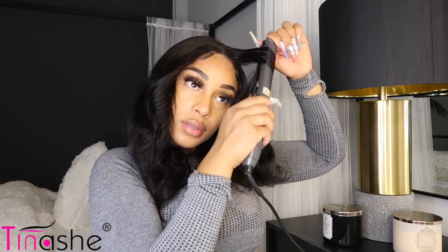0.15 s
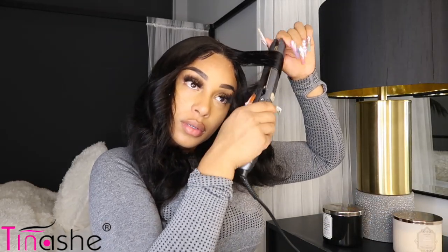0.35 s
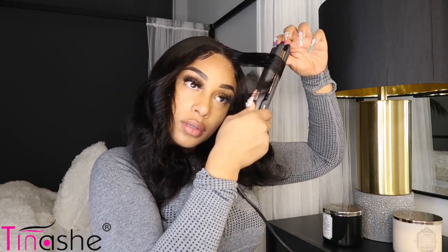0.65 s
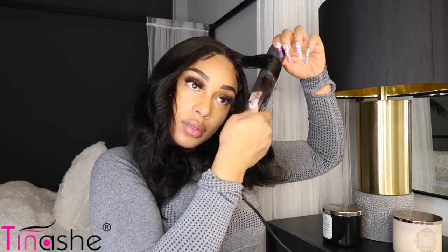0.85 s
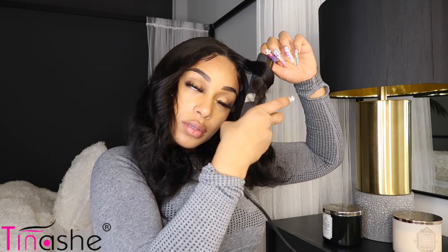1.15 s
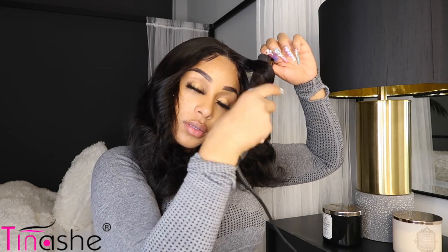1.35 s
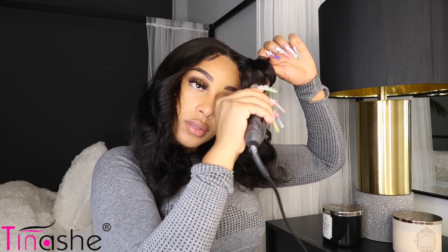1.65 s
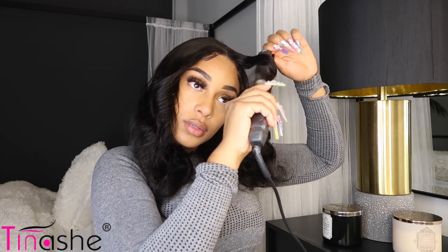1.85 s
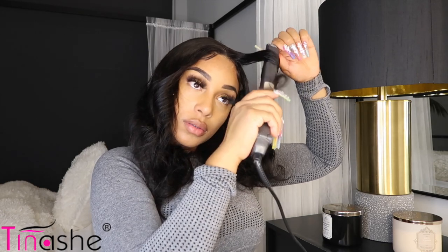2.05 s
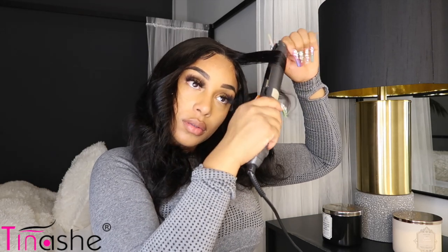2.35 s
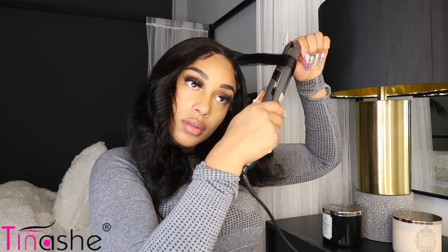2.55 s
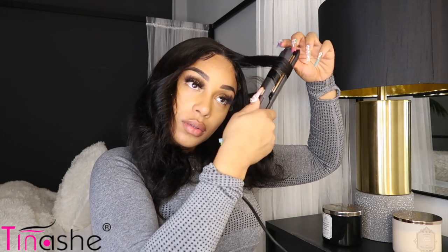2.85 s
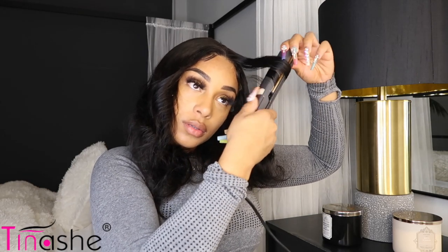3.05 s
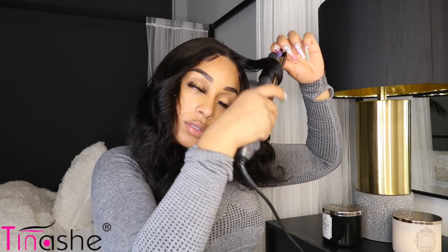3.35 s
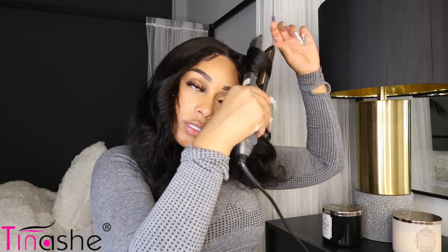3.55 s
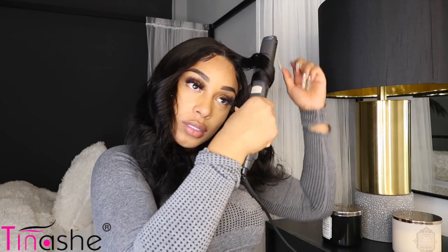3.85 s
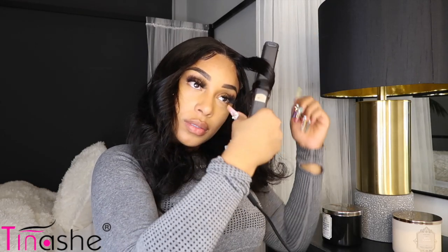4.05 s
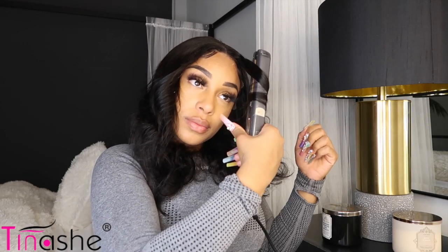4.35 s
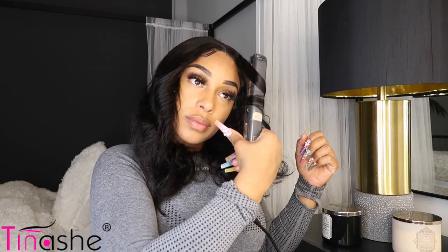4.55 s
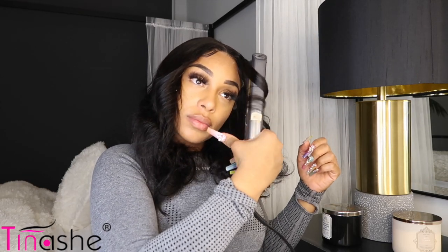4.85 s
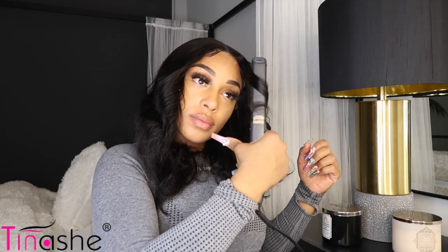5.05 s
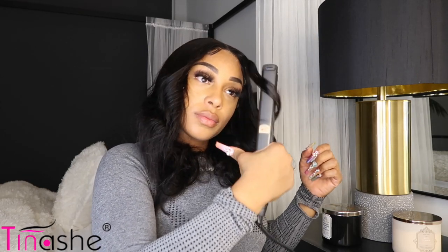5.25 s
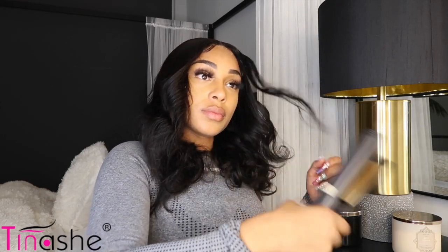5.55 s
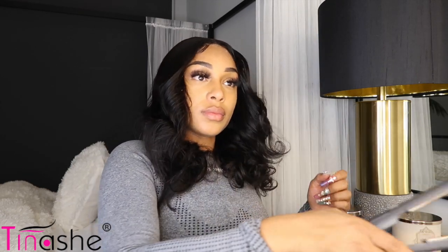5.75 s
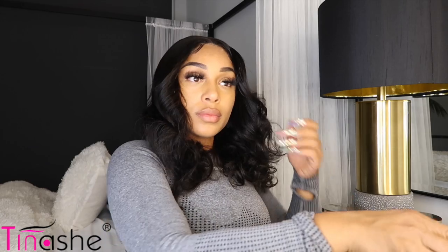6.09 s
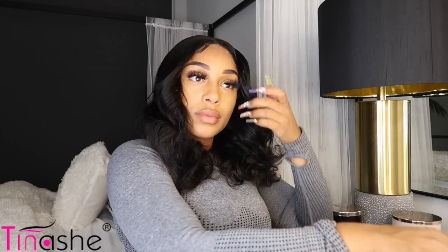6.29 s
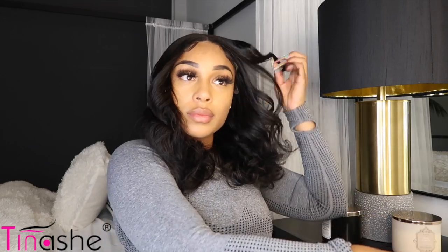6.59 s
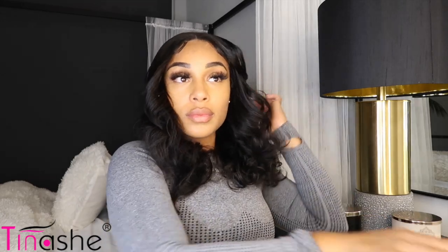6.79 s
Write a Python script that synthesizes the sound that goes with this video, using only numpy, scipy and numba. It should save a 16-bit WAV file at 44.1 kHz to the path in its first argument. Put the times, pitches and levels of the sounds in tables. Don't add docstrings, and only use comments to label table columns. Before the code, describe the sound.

In a quiet, softly furnished bedroom with low ventilation hum, fingernails and a hinge tick faintly on a plastic hair iron. One firm plate snap comes, then after a pause several quick, hard, brittle snaps. The iron brushes and bumps a wooden side table, then lands with a loud clack and hollow boom, rocking briefly to rest. Heard by a phone at arm's length, which dips the level after loud blows.

```python
import sys
import numpy as np
from scipy import signal
from scipy.fft import rfft, irfft, next_fast_len
from scipy.io import wavfile
from scipy.ndimage import uniform_filter1d
from numba import njit

SR = 44100
rng = np.random.default_rng(int(sys.argv[2]) if len(sys.argv) > 2 else 0)


def volts(x):
    e = np.asarray(x, float) / 20
    return 10 ** e


def unload_wav(signal):
    wavfile.write(
        sys.argv[1],
        SR,
        np.round(np.clip(np.atleast_2d(signal).T, -1, 1) * 32767).astype(np.int16),
    )


N = 305377

IRON_PAN_DB, IRON_LAG = -1.0, 0.9
CRACK_SIDE_DB = -2.5
SMALL_SCATTER_DB = 1.5
OPPOSITE = np.array([[1], [-1]])


def unit(x):
    return x / np.sqrt(np.mean(x ** 2))


def peak_one(x):
    return x / np.abs(x).max()


def add(track, start, sound):
    i = int(start * SR)
    track[..., i:i + sound.shape[-1]] += sound[..., :N - i]


def decay(t, t60):
    return 1000.0 ** (-t / t60)


def ring(modes, stretch, scatter_db):
    detune = 0.012
    hz, db, t60 = np.array(modes).T[:, :, None]
    t = np.arange(int(0.3 * SR)) / SR
    level_luck, pitch_luck = rng.standard_normal((len(modes), 2)).T[:, :, None]
    swing = np.sin(2 * np.pi * hz * (1 + detune * pitch_luck) * t)
    y = volts(db + scatter_db * level_luck) * swing * decay(t, t60 * stretch)
    return y[::2].sum(axis=0) - y[1::2].sum(axis=0)


def push(y, ms):
    contact = np.hanning(int(np.clip(ms, 0.05, 8) * SR / 1000) + 3)
    return peak_one(np.convolve(y, contact)[:len(y)])


def walk(rate):
    hold = int(SR / rate)
    steps = np.repeat(rng.standard_normal(N // hold + 1), hold)
    return uniform_filter1d(uniform_filter1d(steps, hold), hold)[:N]


def coloured(points, size, modes=()):
    hz, db = np.transpose(points)
    f = np.maximum(np.arange(size // 2 + 1) * SR / size, 1)
    lift = sum(g / (1 + (2 * (f - c) / w) ** 2) for c, w, g in modes)
    db = np.interp(np.log(f), np.log(hz), db) + lift
    return irfft(rfft(rng.standard_normal(size)) * volts(db), size)


def crack(t60):
    # frequency in Hz, level in dB per Hz.
    spectrum = [(2500, -7), (4800, 1.5), (6200, 1.5), (8000, -4), (10500, -10.5), (14000, -9), (16500, -22)]
    t = np.arange(int(0.3 * SR)) / SR
    spit_and_fizz = decay(t, t60) + volts(-5) * decay(t, 14.0 * t60)
    return peak_one(coloured(spectrum, len(t)) * spit_and_fizz)


def ports(x, pan_db, lag, low_hz, high_hz):
    x = signal.sosfilt(signal.butter(3, [low_hz, high_hz], "band", fs=SR, output="sos"), x)
    size = next_fast_len(N)
    turn = np.exp(-2j * np.pi * np.arange(size // 2 + 1) / size * lag)
    late = irfft(rfft(x, size) * turn, size)[:N]
    return volts(np.array([[pan_db], [-pan_db]]) / 2) * np.array([late, x])


def iron_ports(out, wide):
    return ports(out, IRON_PAN_DB, IRON_LAG, 300, 13200) + wide * OPPOSITE


def snaps():
    times = [3.7803, 4.7720, 5.0044, 5.2154, 5.3980, 5.5638]
    # peak in dB, lower modes re peak in dB, plate ring in dB.
    strengths = [
        (-3.5, -7.5, -29.5),
        (-25, -7.5, -41),
        (1, -5, -39),
        (-5.5, -3, -38.5),
        (1, -6, -33.5),
        (-21, -5.5, -27),
    ]
    # frequency in Hz, level in dB, t60 in seconds.
    arm_low = [(700, -1, 0.02), (1430, 16, 0.016), (1820, 9.5, 0.03), (2033, 14, 0.018)]
    arm_mid = [(3170, 0.5, 0.014), (3640, -7.5, 0.016), (3850, -0.3, 0.011), (4850, -7.5, 0.0034),
               (6100, -13, 0.0099)]
    plate = [(3190, -16.5, .3)]
    # share of the chatter time, level in dB.
    chatter = [(.55, -11), (1.1, -11)]
    chatter_ms, arm_stretch = 1.603, 0.82
    out, wide = np.zeros((2, N))
    for s, (db, low_db, plate_db) in zip(times, strengths):
        crack_db = -14.5 + 0.34 * db
        arms = push(ring(arm_mid, arm_stretch, 1.2), 0.1)
        arms = arms + volts(low_db) * push(ring(arm_low, arm_stretch, 1.5), 0.1)
        for late, size_db in chatter:
            arms = arms + volts(size_db) * np.roll(arms, int(late * chatter_ms * SR / 1000))
        snap = peak_one(arms) + volts(crack_db) * crack(0.0058) + volts(plate_db) * ring(plate, 0.73, 0)
        add(out, s, volts(db) * snap)
        add(wide, s, volts(db + crack_db + CRACK_SIDE_DB) * crack(0.005))
    return iron_ports(out, wide)


def ticks():
    # start in seconds, peak in dB, pitch in Hz, crack re peak in dB.
    taps = [(0.989, -36, 3570, -15), (.998, -29.5, 3580, -19), (1.013, -35.5, 1470, -19),
            (1.109, -32, 3520, -10), (1.168, -36.5, 3080, -0.5), (1.270, -26.5, 2670, -4),
            (1.454, -39, 1206, -26), (1.796, -37.5, 2815, -13), (2.035, -42, 1110, -28),
            (3.417, -43.5, 4500, 0), (3.489, -37.5, 1270, -30), (3.502, -29, 2150, -38),
            (3.671, -40, 3480, -15), (4.841, -40.5, 2170, -12), (5.884, -33, 2640, -18),
            (6.411, -12.5, 2790, -14.5)]
    out, wide = np.zeros((2, N))
    for s, db, hz, crack_db in taps:
        t60 = 41 / hz
        modes = [(hz, 0, t60), (0.44 * hz, -4, 0.95 * t60), (0.91 * hz, -5, t60), (1.3 * hz, -5, t60)]
        shell = push(ring(modes, 0.88, SMALL_SCATTER_DB), 0.08)
        add(out, s, volts(db) * (shell + volts(crack_db) * crack(0.55 * t60)))
        add(wide, s, volts(db + crack_db + CRACK_SIDE_DB) * crack(0.7 * t60))
    return iron_ports(out, wide)


def table():
    # start in seconds, peak in dB, boom share in dB, ring stretch.
    knocks = [(5.565, -29.5, -2, 0.57), (5.889, -21, 12, .6), (5.9, -23, 9.5, 0.82),
              (5.935, -31.5, 8.5, .8), (5.974, -34, 13, .76), (5.988, -13.5, 1.7, 1.9),
              (6.0149, -10.5, 4, 1.37), (6.027, -30, 14, 0.4), (6.048, -22, -0.5, 0.36),
              (6.099, -30, 14, 1.6), (6.438, -16.5, 11.5, 1.1), (6.4502, 10, -24.5, 1.13),
              (6.4536, 9.5, -16.5, 0.2), (6.502, -6.5, -13, .8), (6.565, 0, 12.5, 2.7),
              (6.5764, 3.1, -8, 0.84), (6.603, 3.5, 1, 0.45), (6.613, -3, 1.5, 0.5), (6.63, -3.5, 3.5, 0.4),
              (6.663, -12.5, -10, 1.15)]
    # peak time in seconds, peak in dB,
    # rise in dB/s, settling in dB/s, grit level in dB.
    drags = [
        (5.6, -44.5, 204.5, 54, -6),
        (6.02, -21.5, 266, 274, -12),
        (6.412, -30.5, 5994, 105, 3.5),
        (6.459, -18, 912, 220, -6),
        (6.582, -16.5, 895.5, 188, -6.5),
    ]
    # frequency in Hz, level in dB, t60 in seconds.
    boom_modes = [(125.5, -3, 0.16), (190, -12.5, 0.16), (221, -20.5, 0.56), (306, -7, 0.19)]
    top_modes = [(425, 9.5, 0.03), (565, 7, 0.0217), (724, 8.5, 0.03), (986, 4.5, 0.027), (1294, 7, 0.015),
                 (2030, 3, 0.0087), (2130, -20.5, 0.24), (2730, -14.5, 0.04), (3440, -14, 0.053),
                 (4440, -12.5, 0.016), (7300, -7.5, 0.006)]
    out = np.zeros(N)
    for s, db, boom_db, stretch in knocks:
        blow = ring(top_modes, stretch, 2.0) + volts(boom_db) * ring(boom_modes, 0.7, 2.1)
        contact_ms = 0.82 * volts(0.88 * boom_db)
        add(out, s, volts(db) * push(blow, contact_ms))
    t = np.arange(N) / SR
    slips = rng.standard_normal((2, N)) * (rng.random((2, N)) < 900 / SR)
    slips = slips * volts(0.99 * rng.exponential(size=(2, N)))
    body_hit = push(ring(top_modes + boom_modes, 0.26, 0.62), 0.96)
    grit_hit = push(ring(top_modes[4:], 0.15, SMALL_SCATTER_DB), 0.14)
    body = unit(signal.fftconvolve(slips[0], body_hit)[:N])
    grit = unit(signal.fftconvolve(slips[1], grit_hit)[:N])
    for s, db, rise, settle, grit_db in drags:
        swell = volts(db - np.where(t < s, rise * (s - t), settle * (t - s)))
        out += swell * (body + volts(grit_db) * grit)
    return ports(out, -1.6, 1.8, 110, 11000)


def scuffs():
    # start in seconds, peak in dB, length in seconds, centre in Hz.
    strokes = [
        (0.997, -51.5, 0.0553, 1420),
        (1.277, -52.5, 0.052, 2880),
        (1.443, -54, 0.032, 1200),
        (3.403, -58.5, 0.038, 4960),
        (3.475, -47.5, 0.055, 1500),
        (3.576, -45.5, 0.033, 896),
    ]
    out = np.zeros(N)
    for s, db, length, hz in strokes:
        size = int(length * SR)
        grains = rng.standard_normal(4410)[:size] * volts(3.7 * rng.exponential(size=4410))[:size]
        band = signal.butter(2, [0.45 * hz, 1.47 * hz], "band", fs=SR, output="sos")
        add(out, s, volts(db) * unit(signal.sosfilt(band, grains)) * np.hanning(len(grains)))
    return ports(out, IRON_PAN_DB, IRON_LAG, 370, 15500)


def room(x):
    # frequency in Hz, t60 in seconds.
    reverb = [(150, 0.396), (1000, 0.37), (3200, 0.34), (8000, 0.33)]
    # frequency in Hz, side re mid in dB.
    width = [(60, -30.5), (110, -15.5), (200, -34), (380, -11), (700, -19), (1290, -17.5), (2380, -17),
             (4400, -25), (8120, 11), (15000, 12)]
    # delay in seconds, level in dB.
    walls = [(.0050, -20), (.0088, -17), (.0112, -19), (.0195, -21), (.0250, -21)]
    size = int(0.6 * SR)
    t = np.arange(size) / SR
    hz, t60 = np.transpose(reverb)
    side_hz, side_db = np.transpose(width)
    tail = np.zeros((2, size))
    for f in 84.2 * 2 ** np.arange(8):
        band = signal.butter(2, [f / 2 ** 0.5, f * 2 ** 0.5], "band", fs=SR, output="sos")
        fade = decay(t, np.interp(np.log(f), np.log(hz), t60))
        mid, side = signal.sosfilt(band, rng.standard_normal((2, size))) * fade
        tail += mid + volts(np.interp(np.log(f), np.log(side_hz), side_db)) * side * OPPOSITE
    tail *= 1 - np.exp(-t / 0.002)
    tail *= volts(-10) / np.sqrt(np.sum(tail.mean(axis=0) ** 2))
    for s, db in walls:
        tail[:, int(s * SR)] += volts(db)
    tail = signal.sosfilt(signal.butter(6, 8800, fs=SR, output="sos"), tail)
    return signal.fftconvolve(x.mean(axis=0)[None], tail, axes=1)[:, :N]


def air():
    # frequency in Hz, level in dB per Hz.
    rumble = [(13, -56.5), (22, -22), (49, 0.5), (135, -13), (154, -12), (233, -9), (306, -15.5),
              (352, -18), (382, -15.5), (592, -23), (1050, -26), (1310, -27), (10600, -48), (13500, -65.5),
              (15500, -83)]
    hiss = [(13, -49), (22, -38.5), (132, -2), (367, -0.5), (465, -3), (530, -6.5), (727, -8.5),
            (2080, -16), (7950, -31), (11800, -32), (15300, -50), (22000, -120)]
    # frequency in Hz, width in Hz, lift in dB.
    room_modes = [(55.3, 5.8, 3), (128.2, 23, 6.5), (184, 14, 3.5), (216, 3, 6), (302, 25, 8.5)]
    size = next_fast_len(N)
    mid = volts(-46 + 1.6 * walk(9)) * unit(coloured(rumble, size, room_modes))[:N]
    side = volts(-54.5) * unit(coloured(hiss, size))[:N]
    whine = volts(4.1 * walk(14)) * np.sin(2 * np.pi * 13006 * np.arange(N) / SR)
    mid = mid + volts(-83.5) * whine
    side = side + volts(-76) * whine
    return np.array([mid + side, mid - side])


def scene():
    near = snaps() + ticks() + table() + scuffs()
    return near + room(near) + air()


@njit
def follow(x, attack, release):
    y, e = np.empty(len(x)), 0.
    for i in range(len(x)):
        e += (x[i] - e) * (attack if x[i] > e else release)
        y[i] = e
    return y


def band_limit(x):
    return signal.sosfilt(signal.butter(12, 16480, fs=SR, output="sos"), x)


def record(dry):
    duck_db, ratio, attack_s, release_s = -21.5, 1.7, 0.0088, 0.75
    level = follow(np.abs(dry).max(axis=0), 1 / (attack_s * SR), 1 / (release_s * SR))
    gain = np.minimum(1, volts(duck_db) / (level + 1e-9)) ** (1 - 1 / ratio)
    clipped = np.clip(dry * gain, -1, 1)
    mic_top = signal.ellip(8, 0.2, 70, 16200, fs=SR, output="sos")
    return band_limit(signal.sosfilt(mic_top, clipped))


dry = scene()
out = record(dry)
unload_wav(out)
```